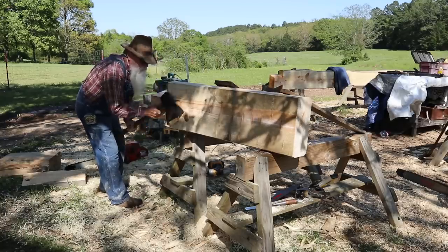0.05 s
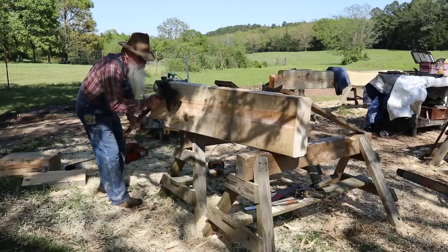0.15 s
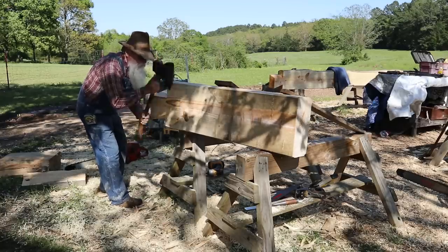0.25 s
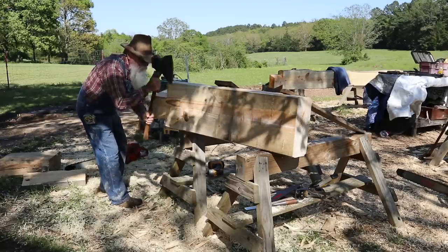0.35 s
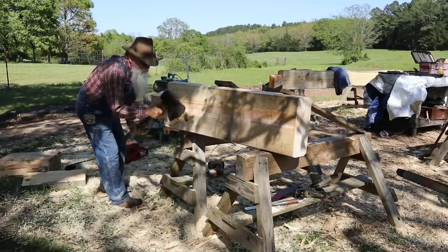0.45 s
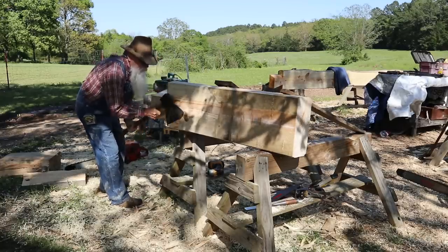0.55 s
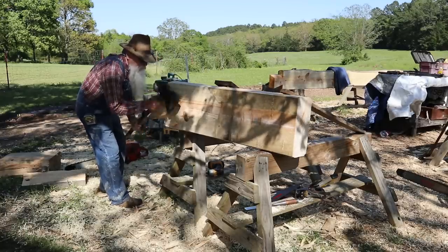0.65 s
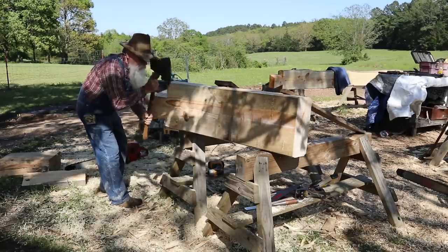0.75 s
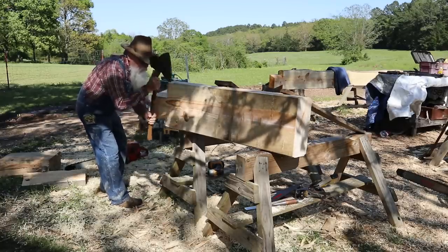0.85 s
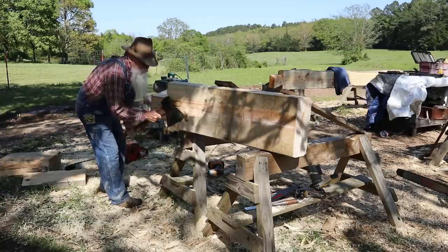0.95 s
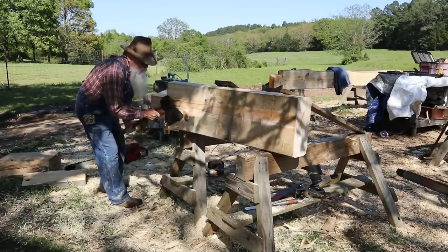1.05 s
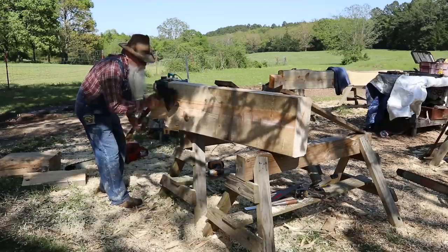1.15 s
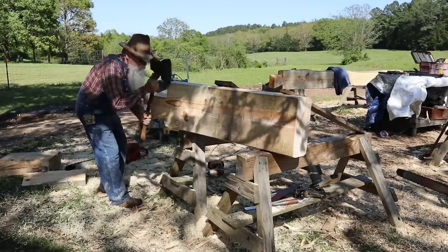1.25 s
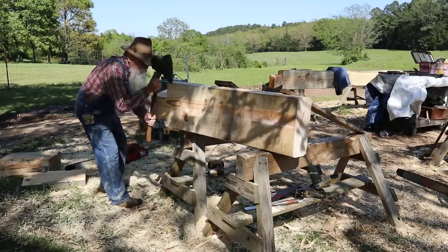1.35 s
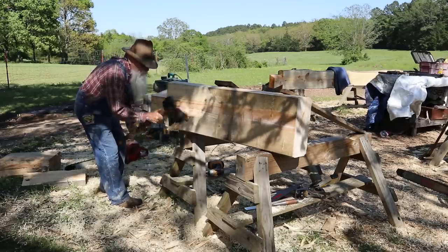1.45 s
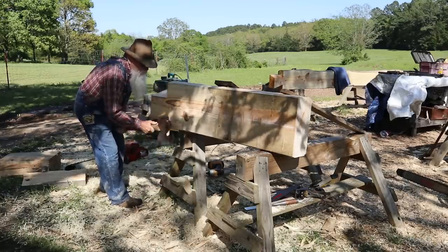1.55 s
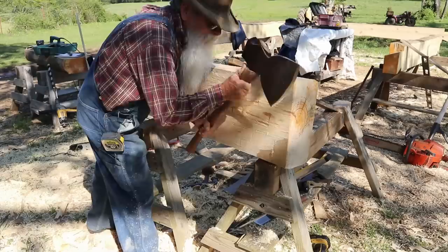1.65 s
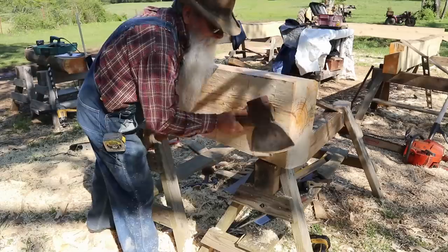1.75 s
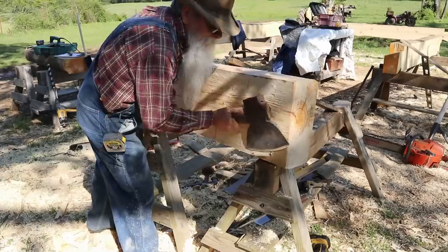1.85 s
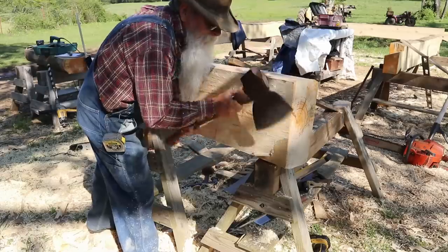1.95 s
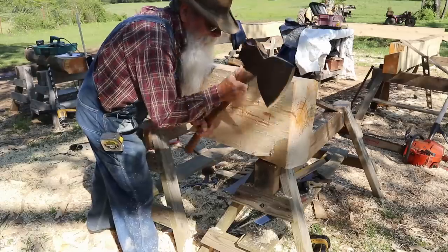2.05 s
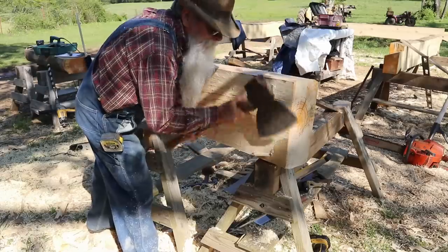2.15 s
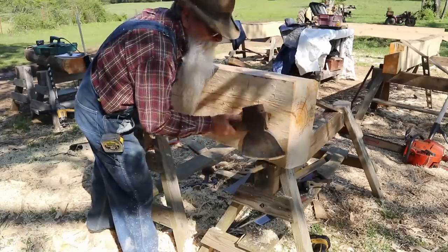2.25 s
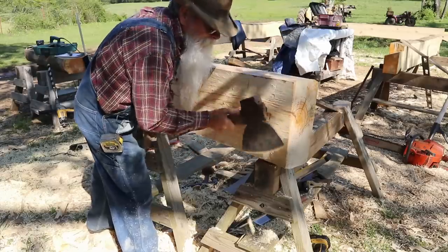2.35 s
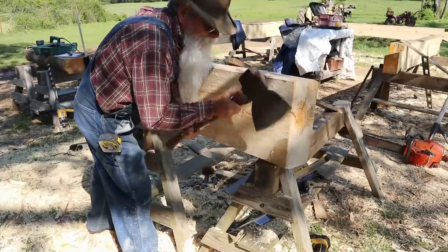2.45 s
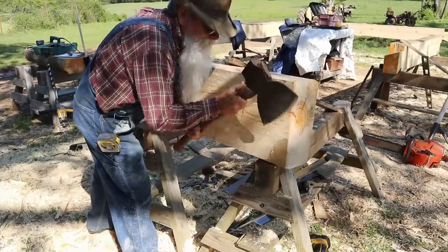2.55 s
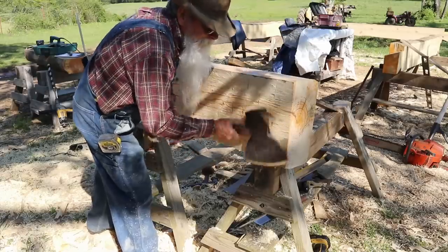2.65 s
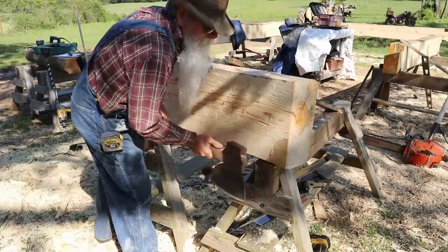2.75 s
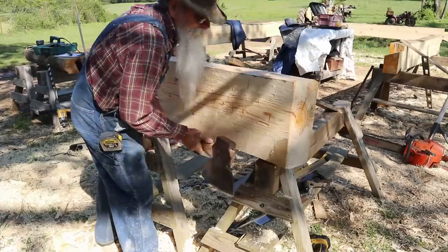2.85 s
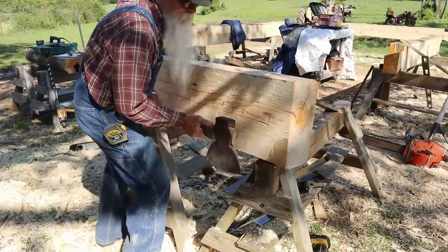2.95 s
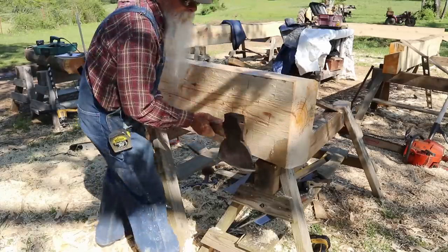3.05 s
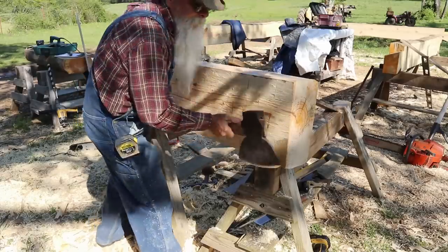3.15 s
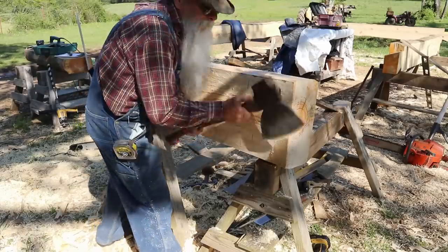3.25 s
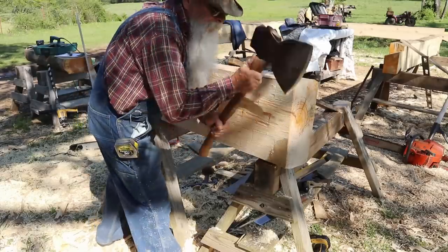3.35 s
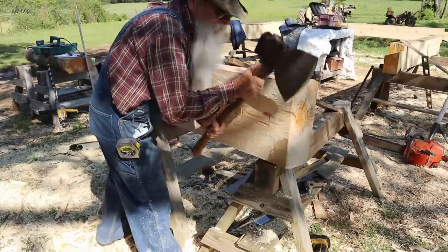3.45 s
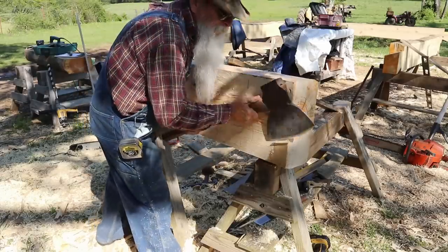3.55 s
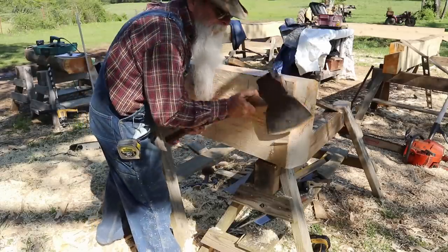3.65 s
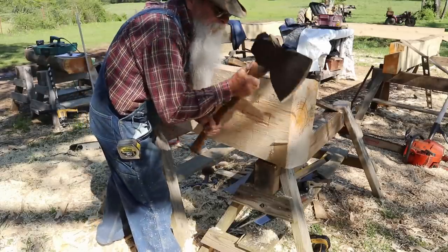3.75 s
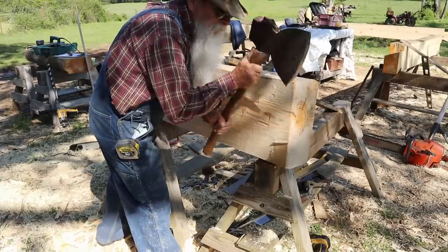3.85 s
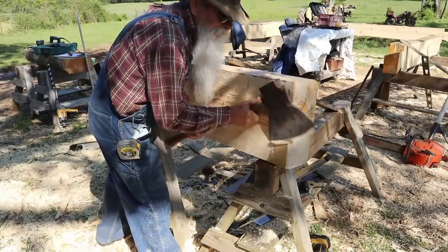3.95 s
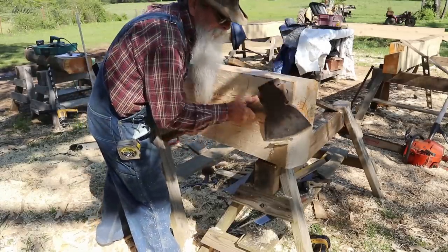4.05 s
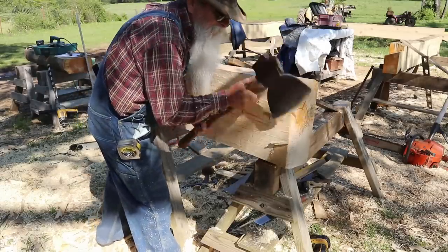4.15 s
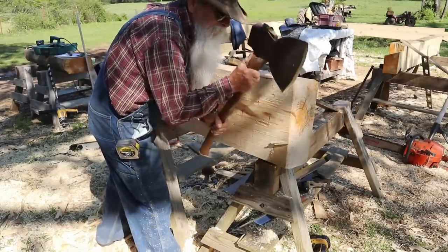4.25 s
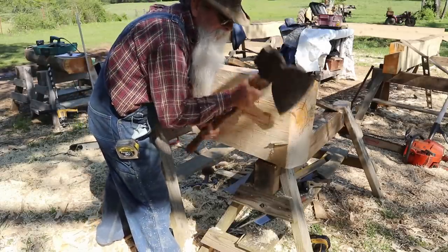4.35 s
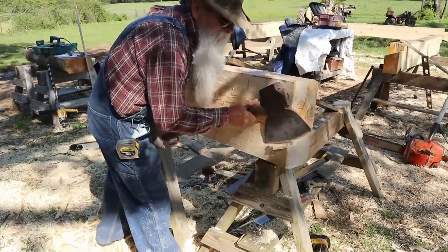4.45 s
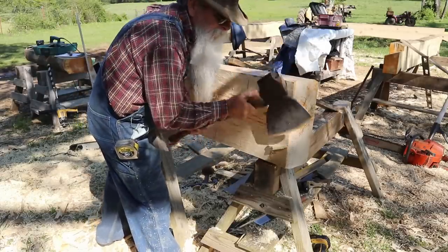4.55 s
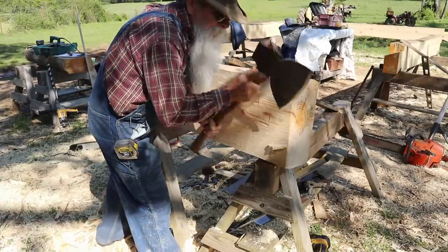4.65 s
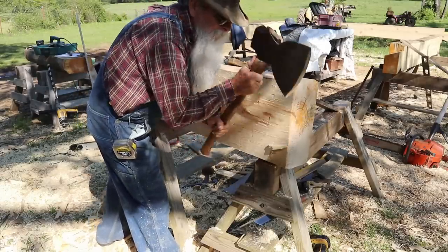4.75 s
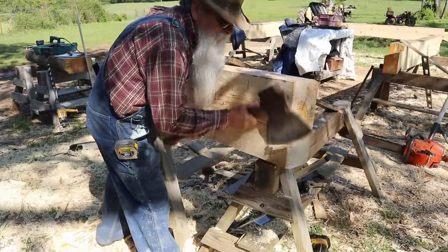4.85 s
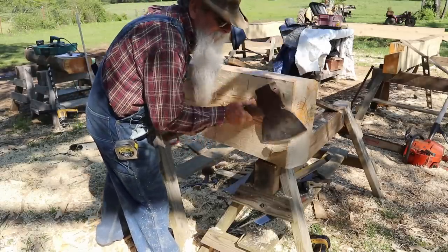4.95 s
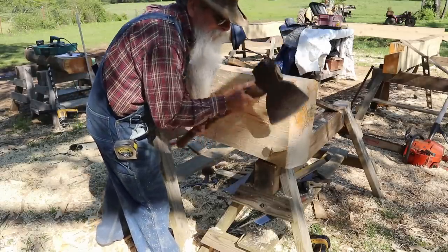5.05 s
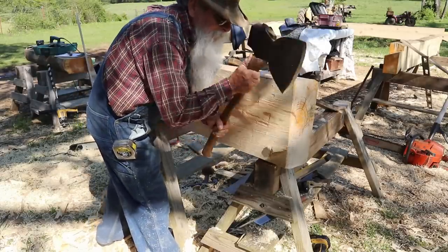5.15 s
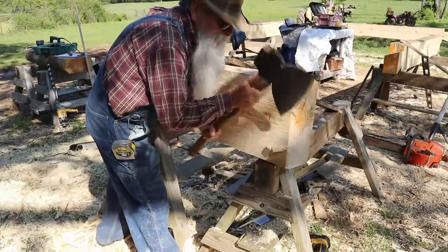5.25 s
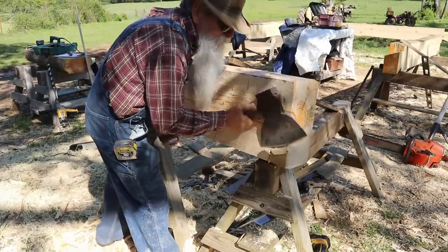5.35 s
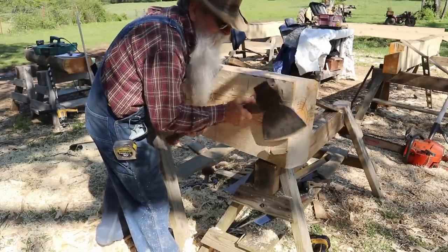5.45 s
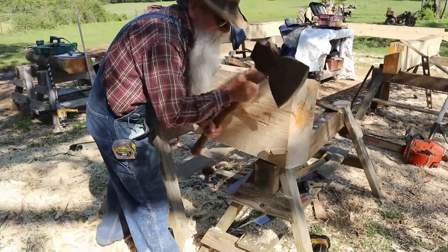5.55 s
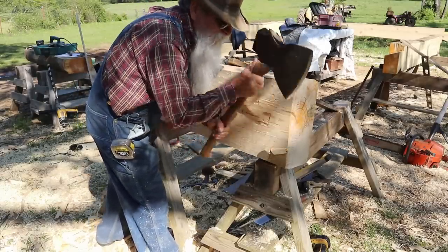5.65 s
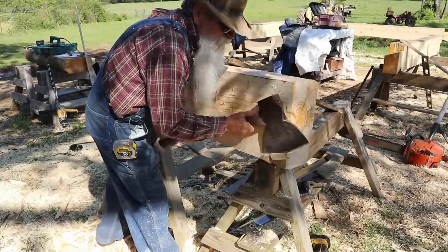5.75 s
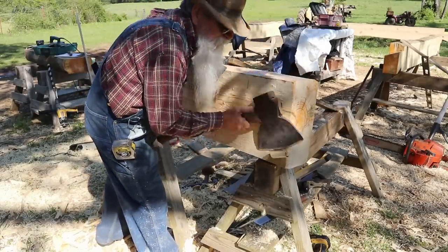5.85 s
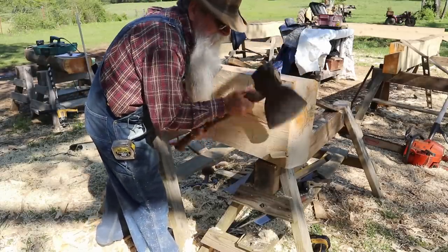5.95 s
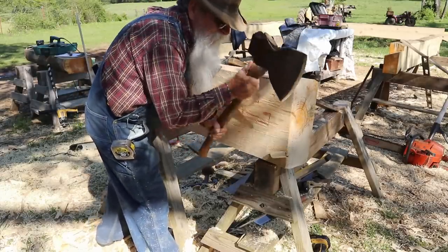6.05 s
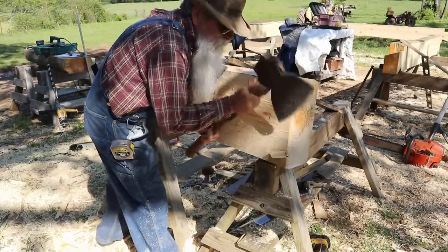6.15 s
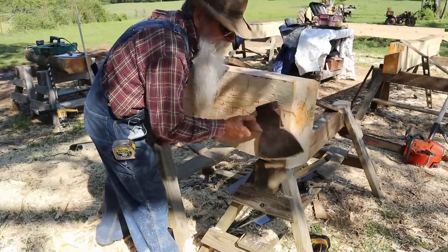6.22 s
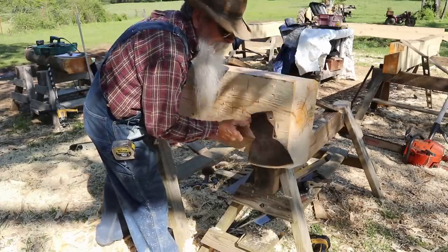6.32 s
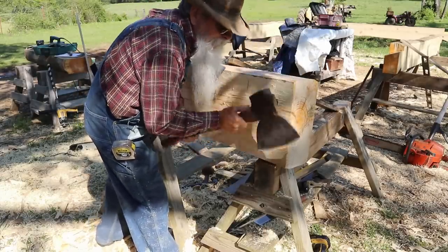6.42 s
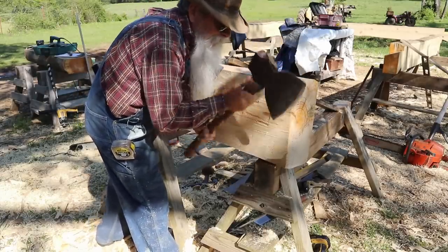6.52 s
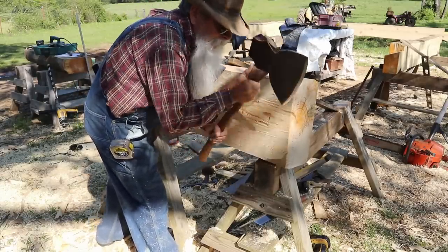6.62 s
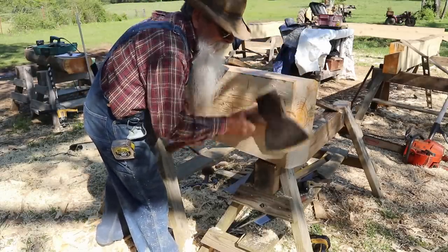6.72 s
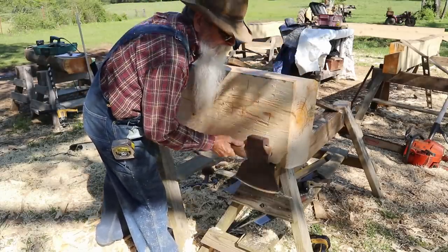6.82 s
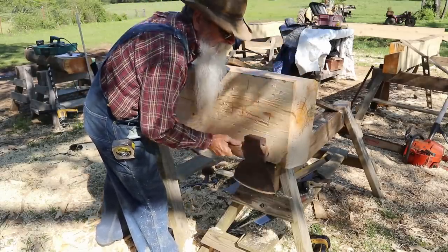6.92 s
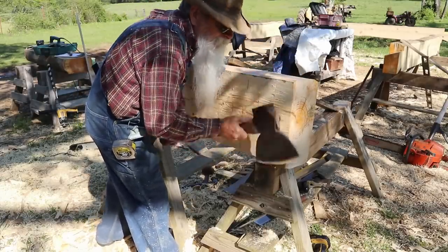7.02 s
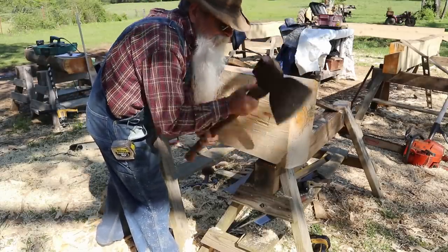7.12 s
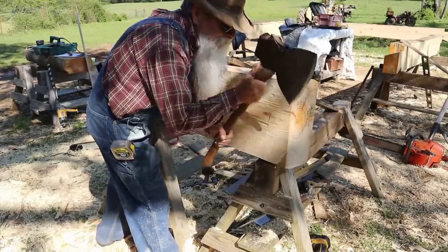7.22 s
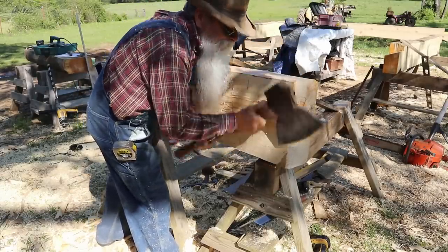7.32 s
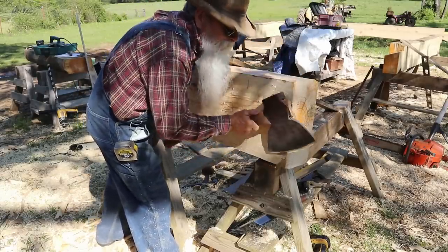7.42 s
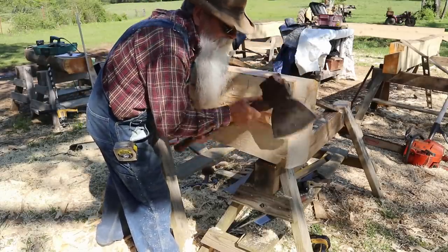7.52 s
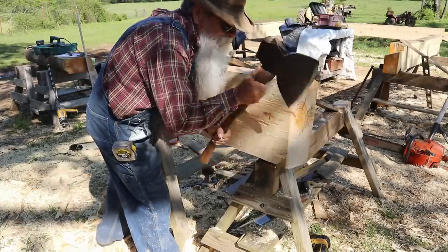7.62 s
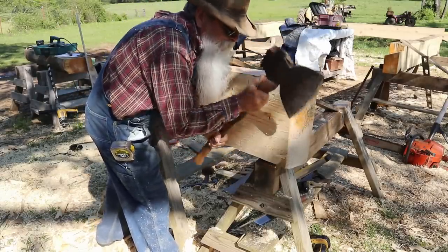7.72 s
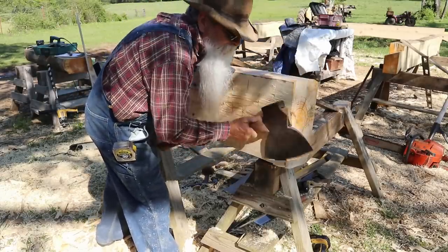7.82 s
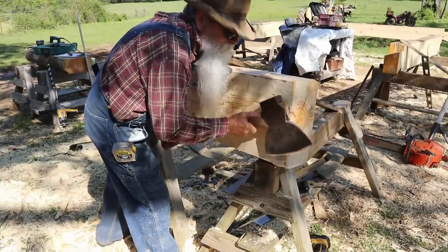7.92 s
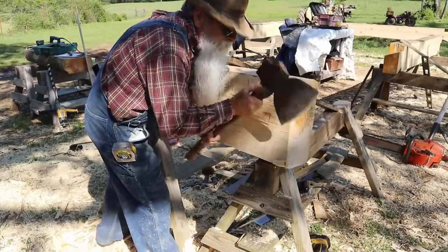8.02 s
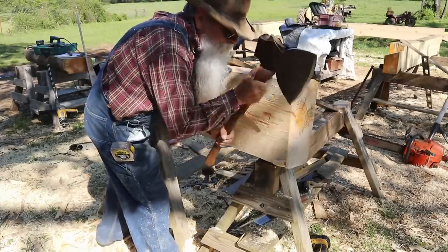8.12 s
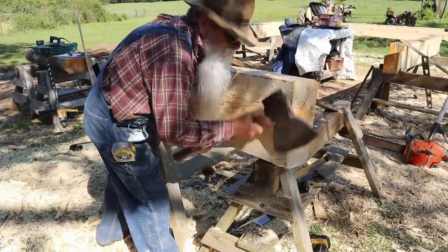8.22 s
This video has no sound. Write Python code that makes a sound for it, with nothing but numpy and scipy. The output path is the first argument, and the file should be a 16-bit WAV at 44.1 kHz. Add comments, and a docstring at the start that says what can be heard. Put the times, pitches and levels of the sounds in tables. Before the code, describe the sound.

A broadaxe chops steadily into a heavy timber outdoors, woody thuds with brief steel rings, first in low wind, then close up.

```python
"""A broadaxe hews a timber on trestles in an open field, first a few metres off in a breeze, then close by.
Each chop jolts timber modes, rings the steel and tears fibres as a fading burst of clicks.
The axe rebounds in blunt knocks, rasps along the face as filtered catches, or swings free and rings as sines.
Chips drop and boots crunch shavings as coloured clicks; an insect trills in falling whistles.
Shaped noise makes wind and field, two sines a far engine; the recorder's gain ducks after loud blows."""
import sys
import numpy as np
from scipy import signal
from scipy.fft import rfft, irfft, next_fast_len
from scipy.io import wavfile
from scipy.ndimage import uniform_filter1d

SR = 44100
rng = np.random.default_rng(int(sys.argv[2]) if len(sys.argv) > 2 else 0)


def to_wav(s):
    """Save 16-bit WAV."""
    ch = np.atleast_2d(s).T  # columns
    pcm = np.round(np.clip(ch, -1, 1) * 32767)  # PCM
    wavfile.write(sys.argv[1], SR, pcm.astype(np.int16))


N = 365148
TIME = np.arange(N) / SR
AGE = TIME[:SR // 4]  # time since a contact
MOVE_CLOSE_S = 1.69  # the microphone moves from a few metres off to close by


def from_db(db):
    """Decibels to gain."""
    return 10 ** (np.asarray(db) / 20)


def rms_one(x):
    """Scale to rms 1."""
    return x / np.sqrt(np.mean(x ** 2) + 1e-20)


def peak_one(x, size=256):
    """Scale so that the loudest few milliseconds have rms 1."""
    loudest_power = uniform_filter1d(x ** 2, size, mode="constant").max()
    return x / np.sqrt(loudest_power + 1e-20)


def energy_one(x):
    """Scale to a total energy of 1."""
    return x / np.sqrt(np.sum(x ** 2) + 1e-20)


def level(rows):
    """Gain along a curve of (time [s], level [dB])."""
    return from_db(np.interp(TIME, *np.transpose(rows)))


def decay(age, t60):
    """Exponential decay that falls by 60 dB in t60 seconds."""
    return from_db(-60 * age / t60)


def swell(s, half_length):
    """A smooth rise and fall of height 1 around a time."""
    return np.exp(-((TIME - s) / half_length) ** 2)


def add(out, s, sound):
    """Mix a sound in at a time."""
    at = max(0, round(s * SR))
    out[at:at + len(sound)] += sound[:N - at]


def drift(rate):
    """Slow chance with spread 1: random knots at the given rate in Hz, joined by lines."""
    knots = np.arange(0, N / SR + 1, 1 / rate)
    return np.interp(TIME, knots, rms_one(rng.standard_normal(len(knots))))


def colour(x, spectrum):
    """Causal (minimum-phase) filter with the given spectrum."""
    size = 2 * next_fast_len(len(x))
    hz, db = np.transpose(spectrum)
    grid = np.maximum(np.arange(size // 2 + 1) * SR / size, 1)
    curve_db = np.interp(np.log(grid), np.log(hz), db)
    # folding the cepstrum onto positive time gives the minimum phase
    cepstrum = irfft(np.log(from_db(curve_db)))
    cepstrum[1:size // 2] *= 2
    cepstrum[size // 2 + 1:] = 0
    return irfft(rfft(x, size) * np.exp(rfft(cepstrum)))[:len(x)]


def resonate(x, hz, width_hz):
    """One resonance with gain 1 on top."""
    r = np.exp(-np.pi * width_hz / SR)  # pole radius
    zeros = np.array([1, 0, -1]) * (1 - r * r) / 2
    poles = [1, -2 * r * np.cos(2 * np.pi * hz / SR), r * r]
    return signal.lfilter(zeros, poles, x + 1e-18)


def strike(force, modes, vary_db):
    """Modes under a force; the place of the blow gives each a strength of its own."""
    out = 0
    for k, (hz, width, db) in enumerate(modes):
        gain = from_db(db + vary_db * rng.standard_normal())
        shifted_hz = hz * (1 + .012 * rng.standard_normal())
        out = out + (-1) ** k * gain * resonate(force, shifted_hz, width)  # alternating sign
    return peak_one(out)


def favour(x, hz, width_hz, boost_db):
    """Where and how deep the edge sits lifts one pitch above the rest."""
    return peak_one(x + (from_db(boost_db) - 1) * resonate(x, hz, width_hz))


def grains(per_s, spread_db, size):
    """Random clicks of uneven strength, rms 1."""
    strength = from_db(spread_db * np.minimum(rng.exponential(1, size), 4))
    clicks = strength * rng.choice([-1, 1], size)
    return rms_one(clicks * (rng.random(size) < per_s / SR))


def bite(length, tearing):
    """Force of a contact: one jolt, then fibres give way one after another while the edge slows."""
    fibres = grains(7000, 3.3, len(AGE)) * np.exp(-(AGE / max(length, .001)) ** 1.1)
    force = tearing * energy_one(fibres)
    force[0] += 1
    return force


# timber modes from each place of the microphone, strengths before chance: (centre [Hz], width [Hz], level [dB])
TIMBER_FAR_MODES = [(405.4, 130, -21.5), (524, 46, -12.5), (713, 170, -4), (816, 140, -2), (1032, 150, -9),
                    (1280, 59, -7.5)]
TIMBER_NEAR_MODES = [(240, 640, -18.5), (383, 140, -5.5), (495, 110, -2.5), (625, 80, 0.5),
                     (755.6, 100, -3.5), (907, 110, -3), (1055, 39, -4), (1246, 80, -7), (1585, 62, -15.5)]


def timber_at(s):
    """The timber's modes as heard from the listener's place."""
    return TIMBER_FAR_MODES if s < MOVE_CLOSE_S else TIMBER_NEAR_MODES


def low_ring(hz=371, t60=.165, twin_hz=352, twin_t60=.1, twin=.6):
    """A close pair of long-lived low timber modes, which swell over a few cycles."""
    main_mode = np.sin(2 * np.pi * hz * AGE) * decay(AGE, t60)
    twin_mode = twin * np.sin(2 * np.pi * twin_hz * AGE) * decay(AGE, twin_t60)
    return -(main_mode + twin_mode) / (1 + twin) * (1 - np.exp(-AGE / .004))


# chops: (time [s], timber level [dB], strongest timber pitch [Hz], blade level [dB],
# strongest blade pitch [Hz], edge level [dB], fibre crack level [dB], bite length [s])
CHOP_EVENTS = [(0.043, -12, 765, -16, 3000, -16.5, -26.5, 0.0067),
               (0.527, -5, 821, -12, 3000, -15.5, -29, 0.0031),
               (1.02, -7.5, 724, -16, 2930, -17, -27, 0.0063), (1.52, -7, 830, -14, 2910, -18, -25, 0.0034),
               (1.829, -12, 864, -8.5, 2776, -9.5, -21.5, 0.0073),
               (2.264, -14, 869, -6, 3134, -8.5, -16, 0.0045),
               (2.724, -10, 870, -20, 1840, -16.5, -44, 0.0017),
               (3.588, -7, 883, -9, 2890, -13.5, -22, 0.0054),
               (4.035, -10, 770, -11.5, 3030, -12.5, -24, 0.0058),
               (4.485, -9, 603, -13, 2166, -18, -20.5, 0.0064),
               (4.929, -8.5, 917, -10.5, 2626, -18.5, -20, 0.006),
               (5.381, -9, 630, -9, 2430, -16, -17, 0.0037),
               (5.832, -8, 851, -3.5, 2440, -10.5, -25, 0.0027),
               (6.291, -14, 729, -11, 2163, -13, -19.5, 0.0077),
               (6.812, -8.5, 759, -2.5, 2375, -13.5, -13, 0.0016),
               (7.41, -9.5, 737, -18, 1743, -20.5, -24.5, 0.008),
               (7.864, -7, 778, -17.5, 3100, -19, -23.5, 0.0068)]
# steel held in the wood, body and edge, strengths before chance: (centre [Hz], width [Hz], level [dB])
BLADE_MODES = [(1890, 210, -5), (2401, 220, -5), (2934, 300, -1), (3260, 500, -5.5)]
EDGE_MODES = [(3890, 460, -11), (4770, 110, -4), (4820, 340, 0.5), (5520, 590, -5), (7600, 99, -10)]
# spectrum of tearing fibres: (frequency [Hz], density [dB per Hz])
CRACK_SPECTRUM = [(200, -8.5), (1500, 2.5), (4000, -2.5), (7000, 0), (10000, -4.5), (13000, -10.5),
                  (16000, -16)]
LOW_RING_LAG_S, LOW_RING_DB = 0.006, -17  # the low modes answer late; level against the thud, before their swell


def chops():
    """The edge bites: timber thuds, the steel rings briefly in the grip of the wood, fibres crack."""
    out = np.zeros(N)
    for s, timber_db, timber_hz, blade_db, blade_hz, edge_db, crack_db, length in CHOP_EVENTS:
        timber = strike(bite(length, tearing=0.77), timber_at(s), vary_db=2.03)
        thud = from_db(timber_db) * favour(timber, timber_hz, width_hz=350, boost_db=4)
        steel_force = bite(length, tearing=2.4)
        body = strike(steel_force, BLADE_MODES, vary_db=3.5)
        blade = from_db(blade_db) * favour(body, blade_hz, width_hz=220, boost_db=11.0)
        edge = from_db(edge_db) * strike(steel_force, EDGE_MODES, vary_db=4.5)
        tearing_force = bite(length * 1.5, tearing=4.3)
        crack = from_db(crack_db) * peak_one(colour(tearing_force, CRACK_SPECTRUM))
        add(out, s + .001, thud + blade + edge + crack)
        add(out, s + LOW_RING_LAG_S, from_db(timber_db + LOW_RING_DB) * low_ring())
    return out


# spectrum of dry chips and shavings: (frequency [Hz], density [dB per Hz])
SHAVINGS_SPECTRUM = [(180, -51.5), (300, -17), (634, -7.5), (749, -15), (1120, -4), (1690, -11), (2400, -3),
                     (2610, -7.5), (7320, -7.5), (16000, -28)]


def splinters():
    """Just after the cut the chip keeps splitting from the face, in a coarse, fading crackle."""
    out = np.zeros(N)
    for s, *_, crack_db, length in CHOP_EVENTS:
        snaps = grains(1800, 4, len(AGE)) * np.exp(-AGE / .022)
        crackle = peak_one(colour(snaps, SHAVINGS_SPECTRUM))
        add(out, s + 2 * length, from_db(crack_db - 19.5) * crackle)
    return out


# the axe rebounds onto the timber, once or in a short rattle: (time [s], first thud level [dB],
# first clack level [dB], low ring level before its swell [dB], touches [count])
REBOUND_EVENTS = [(0.072, -25, -30, -25.5, 3), (0.56, -22, -25, -45, 3), (1.051, -23, -27.5, -24, 4),
                  (1.579, -32.5, -36.5, -51, 2), (1.862, -30, -48, -19.5, 1), (2.295, -19.5, -28, -13.5, 1),
                  (2.741, -14.5, -21, -8.5, 1), (4.088, -36.5, -41, -35.5, 1), (4.538, -22, -29.5, -29, 1),
                  (4.993, -27, -30.5, -30, 1), (5.441, -25, -25.5, -45, 1), (5.89, -27.5, -27.5, -51, 1),
                  (6.321, -23.5, -51, -18, 1), (6.347, -23, -22, -53, 1), (6.827, -16, -20.5, -25.5, 1),
                  (7.45, -41, -51, -19.5, 1), (7.882, -18.5, -22.5, -15, 1)]
# spectrum of a blunt clack: (frequency [Hz], density [dB per Hz])
CLACK_SPECTRUM = [(500, -6.5), (1200, -1), (2200, 1), (3000, -11), (5000, -14), (8000, -30.5),
                  (16000, -39.5)]
RATTLE_BITE_S, KNOCK_BITE_S = 0.0077, 0.0068  # contact length of a loose touch and of a single firm knock
TOUCH_GAP_S, TOUCH_LOSS_DB, TOUCH_LOSS_GROWTH = 0.0305, 3, 1.54  # the loss grows faster with every touch


def knocks():
    """Blunt second contacts, softer and duller than the cut; a loosely held axe rattles on for a few touches."""
    out = np.zeros(N)
    for s, timber_db, clack_db, ring_db, touches in REBOUND_EVENTS:
        add(out, s, from_db(ring_db) * low_ring())
        for k in range(round(touches)):
            force = bite(RATTLE_BITE_S if touches > 1 else KNOCK_BITE_S, tearing=4.4)
            thud = from_db(timber_db) * strike(force, timber_at(s), vary_db=2.5)
            clack = from_db(clack_db) * peak_one(colour(force, CLACK_SPECTRUM))
            touch_gain = from_db(-TOUCH_LOSS_DB * k ** TOUCH_LOSS_GROWTH)
            add(out, s + .001 + k * TOUCH_GAP_S, touch_gain * (thud + clack))
    return out


# the blade slides along the hewn face: (time it bears on the face [s], level [dB], length under pressure [s])
SLIDE_EVENTS = [(1.129, -49, 0.022), (2.324, -30, 0.024), (4.096, -37.5, 0.033), (4.548, -27, 0.057),
                (4.998, -26.5, 0.054), (5.448, -32.5, 0.0058), (5.493, -29, 0.074), (5.895, -34, 0.053),
                (6.354, -29, 0.02), (7.928, -35.5, 0.0092)]
# spectrum of steel on grain: (frequency [Hz], density [dB per Hz])
SLIDE_SPECTRUM = [(290, -29.5), (500, -6.5), (988, -7), (1250, -17), (2190, -2), (3490, -10), (7640, -1),
                  (14500, -17.5), (16000, -10)]
# resonances that the sliding blade excites, strengths before chance: (centre [Hz], width [Hz], level [dB])
RASP_MODES = [(1714, 50, -3), (2180, 76, 0), (3200, 160, -12), (4060, 47, -1), (5520, 180, -9.5),
              (6150, 100, -4), (7500, 43, -1), (8050, 150, -5), (9050, 110, -4.5)]
GRAZE_S, GRAZE_DB = 0.026, -16  # the blade grazes the face lightly before it bears on it
SLIDE_ATTACK_S, SLIDE_SAG_DB_PER_S = 0.002, 70.5
SLIDE_RELEASE_DB_PER_S = 511  # on top of the sag, once the pressure ends


def slides():
    """Steel rasps over the grain, clumps of tiny catches: it grazes, bears on the face, slows and lifts off."""
    out = np.zeros(N)
    pressed = np.maximum(AGE - GRAZE_S, 0)  # time under pressure
    attack = from_db(GRAZE_DB * np.exp(-pressed / SLIDE_ATTACK_S))
    for s, db, length in SLIDE_EVENTS:
        lifted = np.maximum(pressed - length, 0)
        speed = attack * from_db(-SLIDE_SAG_DB_PER_S * pressed - SLIDE_RELEASE_DB_PER_S * lifted)
        grip = from_db(3 * drift(180)[:len(AGE)])
        catches = grains(3000, 3.5, len(AGE)) * grip * speed
        rasp = peak_one(colour(catches, SLIDE_SPECTRUM)) + strike(catches, RASP_MODES, vary_db=1.0)
        add(out, s - GRAZE_S, from_db(db) * peak_one(rasp))
    return out


# the blade glances off and rings freely: (time [s], lasting ring mode level before its swell [dB], clang modes
# level [dB])
FREE_RING_EVENTS = [(2.725, -16, -12), (6.301, -38.5, -44), (6.815, -21, -34.5)]
# shorter-lived clang modes of the free blade, relative strengths: (frequency [Hz], level [dB], 60 dB decay [s])
CLANG_MODES = [(1877, 1, 0.069), (4690, -1.5, 0.085), (4500, -6.5, 0.05), (7860, -25.5, 0.05),
               (10600, -22.5, 0.063)]
BLADE_RING_HZ, BLADE_RING_T60_S = 2592, 0.48


def free_blade(beat_hz=3.3, twin_db=-15.0, twin_t60=0.76):
    """Out of the wood the steel clangs; its main ring mode lasts and beats against a weaker, slower-dying twin."""
    out = np.zeros(N)
    age = TIME[:SR]
    lasting = np.sin(2 * np.pi * BLADE_RING_HZ * age) * decay(age, BLADE_RING_T60_S)
    twin = np.cos(2 * np.pi * (BLADE_RING_HZ + beat_hz) * age) * decay(age, twin_t60)
    lasting -= from_db(twin_db) * twin
    lasting *= 1 - np.exp(-age / 0.085)  # the tone swells as the blade swings clear
    clang = sum(from_db(db) * decay(AGE, t60) * np.sin(2 * np.pi * hz * AGE) for hz, db, t60 in CLANG_MODES)
    for s, lasting_db, clang_db in FREE_RING_EVENTS:
        add(out, s, from_db(lasting_db) * lasting)
        add(out, s, from_db(clang_db) * clang)
    return out


# chips snap off and drop, and shavings crackle under a shifting boot: (time [s], level [dB])
TICK_EVENTS = [(1.6409, -34.5), (2.4583, -32.5), (2.6975, -40.5), (2.7061, -46), (2.9163, -42),
               (3.1653, -31.5), (3.1899, -35.5), (3.213, -38.5), (4.4115, -41.5), (5.9852, -43),
               (6.4439, -41.5), (6.4487, -34.5), (6.5182, -47), (6.927, -47.5), (7.0068, -51)]
# boots scuff the shavings: (time [s], crunch level [dB], crunch half length [s], knock level [dB])
SCUFF_EVENTS = [(2.845, -44.5, 0.05, -32.5), (2.91, -52, 0.0087, -36), (3.0, -48, 0.02, -54),
                (3.11, -40, 0.028, -34.5), (3.151, -44.5, 0.043, -50), (3.284, -56, 0.0086, -66)]
SHUFFLE_START_S, SHUFFLE_END_S, SHUFFLE_DB = 2.77, 3.58, -57.5  # light rustle while the feet shift
STRAY_CHIPS, STRAY_CHIP_DB = 10, -56.5  # small crumbs land at random


def shavings():
    """Dry chips tick as they snap and land; a boot knocks on loose wood, then crunches the shavings in clumps."""
    clumps = grains(3900, 5, N) * from_db(2.5 * drift(120))
    crunch = rms_one(colour(clumps, SHAVINGS_SPECTRUM))
    shuffling = (TIME > SHUFFLE_START_S) & (TIME < SHUFFLE_END_S)
    out = from_db(SHUFFLE_DB) * shuffling * crunch
    for s, crunch_db, half_length, knock_db in SCUFF_EVENTS:
        out += from_db(crunch_db) * swell(s + half_length, half_length) * crunch
        knock = strike(bite(0.0093, tearing=2.8), TIMBER_NEAR_MODES, vary_db=4.5)
        add(out, s, from_db(knock_db) * knock)
    stray_times = rng.uniform(MOVE_CLOSE_S, N / SR, size=STRAY_CHIPS)
    strays = [(s, STRAY_CHIP_DB) for s in stray_times]
    for s, db in list(TICK_EVENTS) + strays:
        tick = peak_one(colour(bite(0.005, tearing=2.3), SHAVINGS_SPECTRUM))
        add(out, s, from_db(db) * tick)
    return out


def yard(x, t60, wet_db):
    """Dull, short scatter from trestles, ground and stacked timber, as convolution with fading noise."""
    scatter = rng.standard_normal(len(AGE)) * decay(AGE, t60) * (1 - np.exp(-AGE / 0.018))
    # (frequency [Hz], gain [dB])
    dullness = [(200, 0), (600, 0), (1200, -3), (2500, -10), (5000, -17), (16000, -22)]
    response = colour(energy_one(scatter), dullness)
    return from_db(wet_db) * signal.fftconvolve(x, response)[:N]


# insect trills: (start [s], end [s], level [dB])
TRILL_EVENTS = [(0, 0.237, -65), (0.376, 1.45, -67.5), (1.692, 2.122, -62), (2.204, 4.129, -62.5),
                (4.353, 5.078, -63.5), (5.405, 6.472, -66), (6.556, 6.632, -63.5), (6.751, 8.088, -64),
                (8.226, 8.281, -66.5)]


def insect(pulses_per_s=58, top_hz=6800, fall_hz=1250):
    """Each wing stroke is a short whistle that falls in pitch, over the rasp of the file."""
    stroke = np.cumsum(pulses_per_s * (1 + 0.0042 * drift(13))) / SR % 1  # place within the stroke, 0 to 1
    hz = top_hz - fall_hz * stroke + 200 * drift(1500)
    tone = np.sin(2 * np.pi * np.cumsum(hz) / SR)
    whistle = rms_one(tone * from_db(4.8 * drift(920)))
    band = signal.butter(2, [5750, 6600], "band", fs=SR, output="sos")
    rasp = rms_one(signal.sosfilt(band, rng.standard_normal(N)))
    pulse = .15 + np.sin(np.pi * stroke) ** 2
    song = rms_one(pulse * (whistle + 0.68 * rasp))
    gain = sum(from_db(db) * ((TIME >= start) & (TIME < end)) for start, end, db in TRILL_EVENTS)
    return song * uniform_filter1d(gain, size=1024)  # soft starts and ends


# gusts on the microphone, on top of the steady breeze: (time of the height [s], level [dB])
GUST_EVENTS = [(0.0, -32.5), (0.27, -39), (0.49, -30.5), (1.0, -40), (1.419, -38)]
# spectrum of wind on the microphone: (frequency [Hz], density [dB per Hz])
WIND_SPECTRUM = [(12, -31.5), (20, -7), (43, 4.5), (81, -1), (151, 0), (354, -27), (386, -25.5), (528, -35),
                 (600, -45), (780, -74), (1320, -120)]
BREEZE_DB, GUST_HALF_LENGTH_S, BREEZE_FADE_S = -38.5, 0.08, 0.03


def wind():
    """Wind buffets the microphone as low, unsteady noise until it moves close."""
    exposed = np.exp(-np.maximum(TIME - MOVE_CLOSE_S, 0) / BREEZE_FADE_S)
    gusts = sum(from_db(db) * swell(s, GUST_HALF_LENGTH_S) for s, db in GUST_EVENTS)
    breeze = exposed * (from_db(BREEZE_DB) + gusts)
    buffeting = colour(rng.standard_normal(N), WIND_SPECTRUM) * from_db(3.2 * drift(10))
    return breeze * rms_one(buffeting)


# level of the field's murmur: (time [s], level [dB])
FIELD_LEVEL = [(0.0, -56), (0.3, -59.5), (1.5, -60), (1.75, -53), (2.6, -58.5), (3.5, -51.5), (4.2, -55.5),
               (6.1, -58), (6.7, -56), (8.28, -57.5)]
# spectrum of the murmur: (frequency [Hz], density [dB per Hz])
FIELD_SPECTRUM = [(20, -14.5), (53, -11.5), (80, -6.5), (170, -5.5), (380, -12), (560, -15.5), (750, -16.5),
                  (2000, -24.5), (2600, -25.5), (3200, -31.5), (5000, -30), (8000, -33), (16000, -41.5)]


def field_murmur():
    """The open field murmurs: coloured noise along a level curve."""
    return level(FIELD_LEVEL) * rms_one(colour(rng.standard_normal(N), FIELD_SPECTRUM))


# far engine, levels before its trim and flutter: (time [s], firing tone level [dB], octave level [dB])
ENGINE_LEVELS = [(1.9, -61.5, -72.5), (2.57, -72.5, -74.5), (3.46, -58, -67), (3.66, -66, -73),
                 (4.85, -63.5, -70), (6.18, -70, -68), (6.7, -64.5, -63.5), (7.03, -68, -67),
                 (7.44, -61.5, -61.5), (8.28, -66.5, -64.5)]
ENGINE_HZ, ENGINE_TRIM_DB = 84.7, 2.5


def far_engine():
    """An engine hums unsteadily far away: its firing tone and the octave above, each wavering in level."""
    phase = 2 * np.pi * ENGINE_HZ * np.cumsum(1 + 0.016 * drift(11.0)) / SR
    s, firing_db, octave_db = np.transpose(ENGINE_LEVELS)
    firing = from_db(np.interp(TIME, s, firing_db) + 2 * drift(17)) * rms_one(np.sin(phase))
    octave = from_db(np.interp(TIME, s, octave_db) + 2 * drift(9.6)) * rms_one(np.sin(2 * phase))
    return from_db(ENGINE_TRIM_DB) * (firing + octave)


# SQUEEZE is the share of the excess over the threshold that is taken off
THRESHOLD_DB, SQUEEZE, GAIN_ATTACK_S, RECOVERY_DB_PER_S = -23.5, 0.26, 0.042, 9


def gain_control(x):
    """The gain drops just after each loud blow and creeps back, so the background ducks and swells."""
    power = signal.lfilter([.01], [1, -.99], x ** 2)
    excess_db = np.maximum(10 * np.log10(power + 1e-12) - THRESHOLD_DB, 0)
    recovered_db = RECOVERY_DB_PER_S * TIME
    # the deepest cut so far holds, less what has been recovered since
    held_db = np.maximum.accumulate(SQUEEZE * excess_db + recovered_db, axis=-1) - recovered_db
    r = np.exp(-1 / (GAIN_ATTACK_S * SR))
    smooth_cut_db = signal.lfilter([1 - r], [1, -r], held_db)
    return x * from_db(-smooth_cut_db)


FAR_SCATTER_DB = -2.5  # less scatter reaches the first, more open place of the microphone


def scene():
    """The work at the timber, its scatter and the field around it."""
    work = chops() + splinters() + knocks() + slides() + free_blade() + shavings()
    scattered = work * from_db(FAR_SCATTER_DB * (TIME < MOVE_CLOSE_S))
    background = insect() + wind() + field_murmur() + far_engine()
    return (work + yard(scattered, t60=.13, wet_db=-11) + background)[None]


CUTOFF_HZ = 16000


def record(dry):
    """The gain control is too slow for the hardest chops, which overload the input; the top is cut."""
    clipped = np.clip(gain_control(dry), -1, 1)
    lowpass = signal.ellip(10, .1, 70, CUTOFF_HZ, fs=SR, output="sos")
    return signal.sosfilt(lowpass, clipped)


dry = scene()
out = record(dry)
to_wav(out)
```